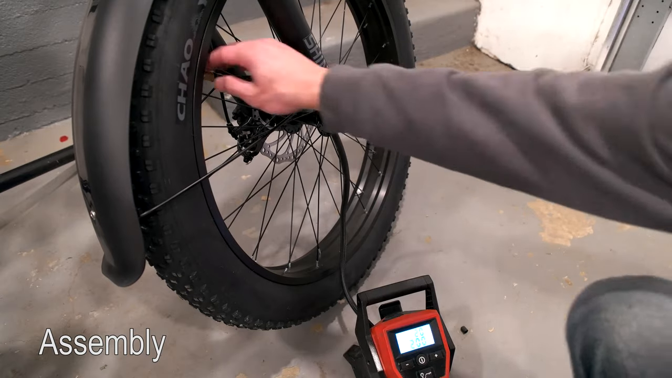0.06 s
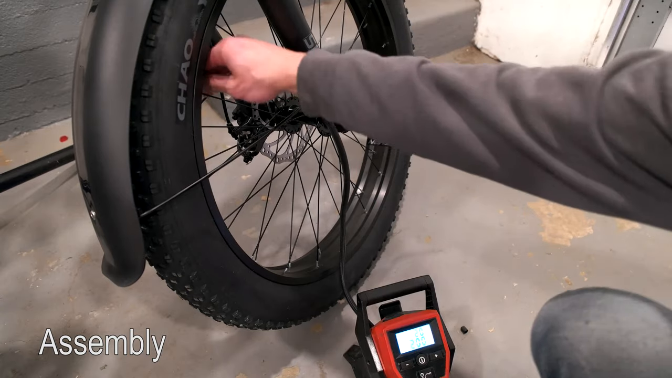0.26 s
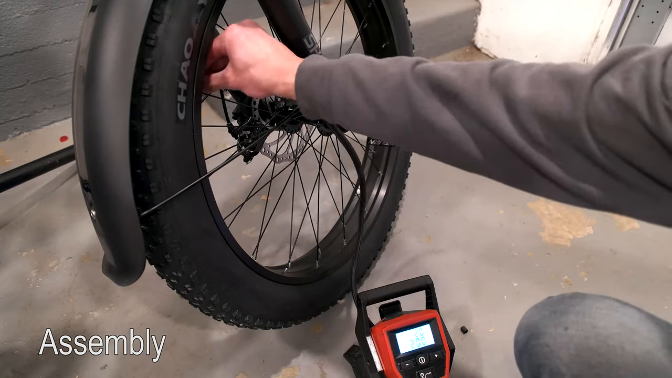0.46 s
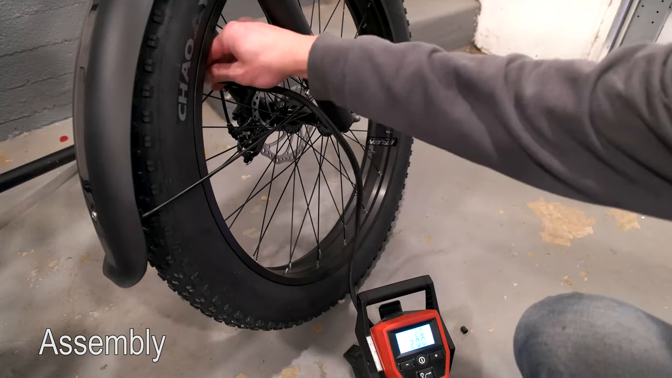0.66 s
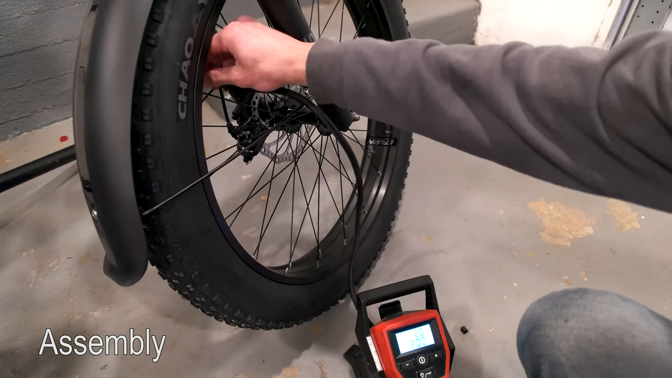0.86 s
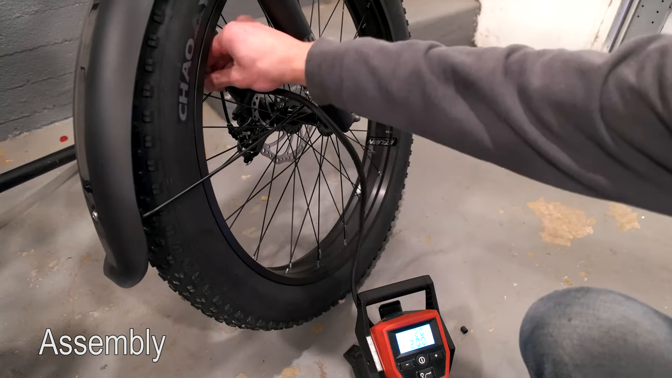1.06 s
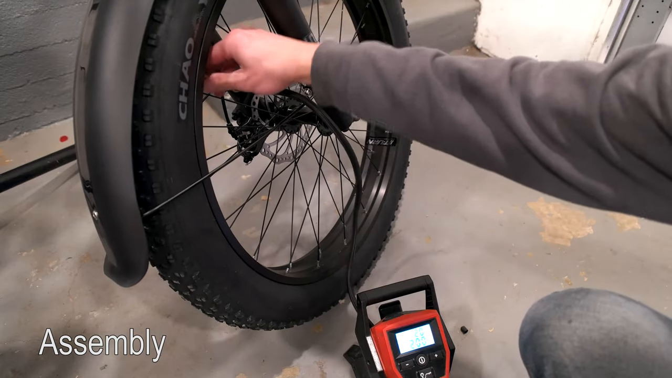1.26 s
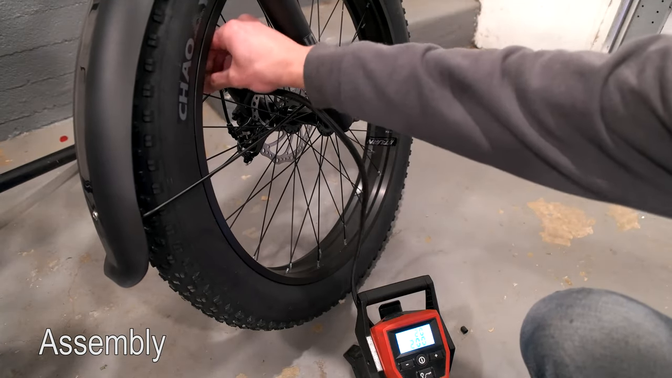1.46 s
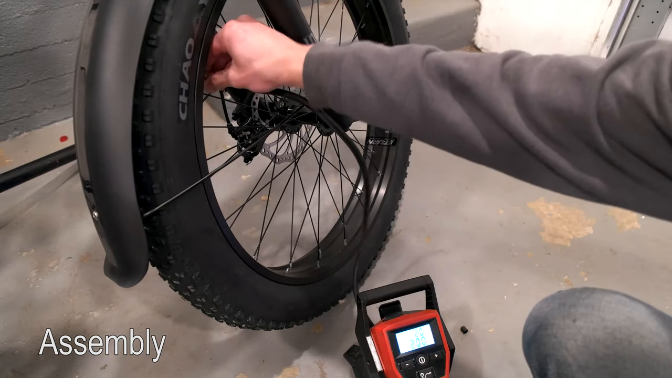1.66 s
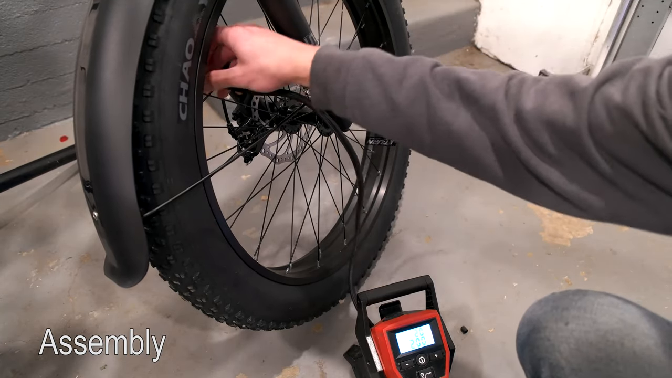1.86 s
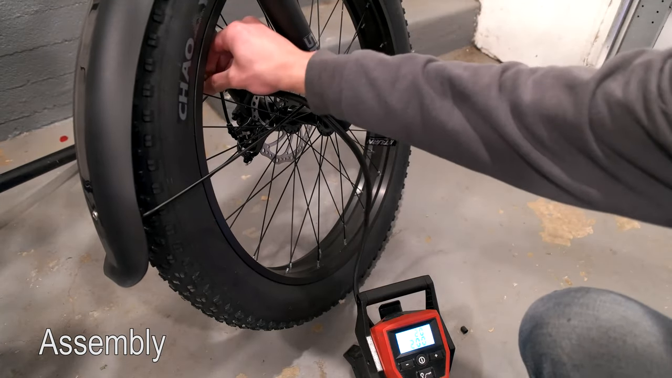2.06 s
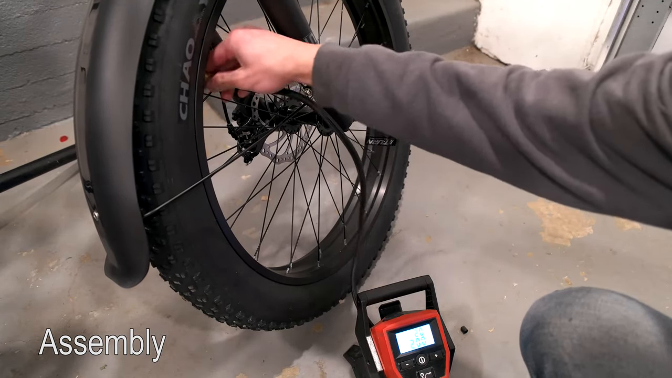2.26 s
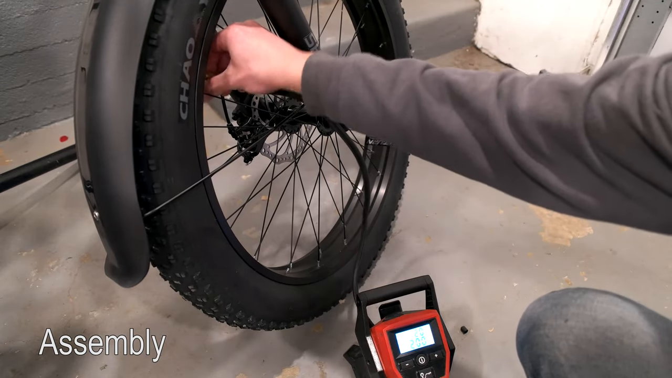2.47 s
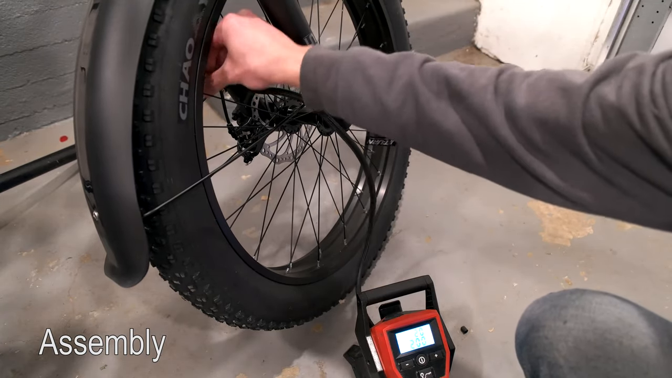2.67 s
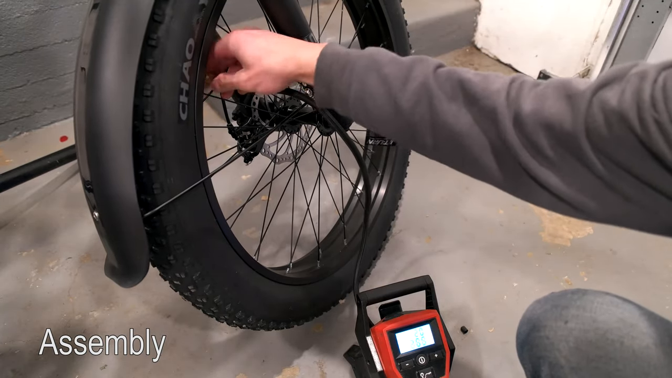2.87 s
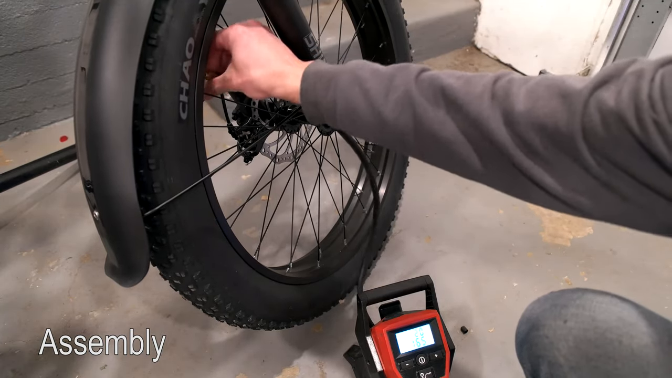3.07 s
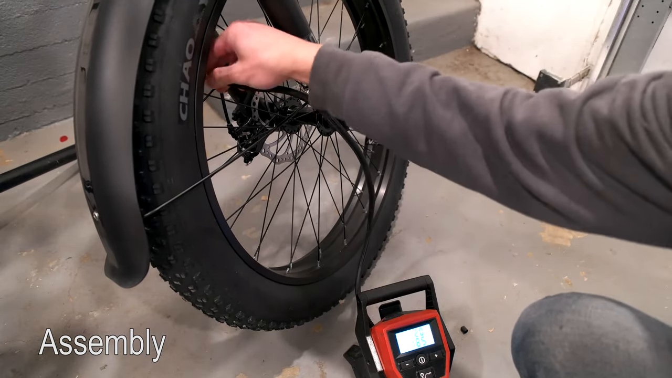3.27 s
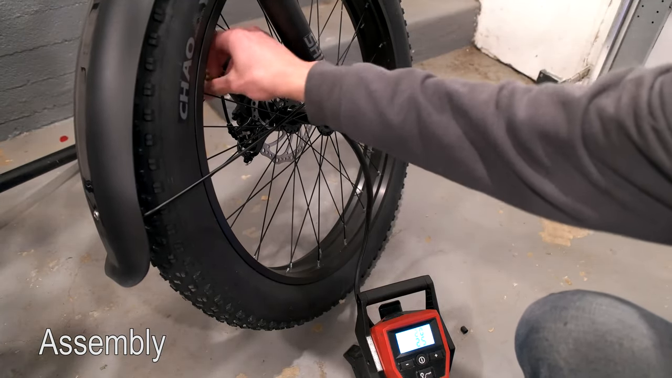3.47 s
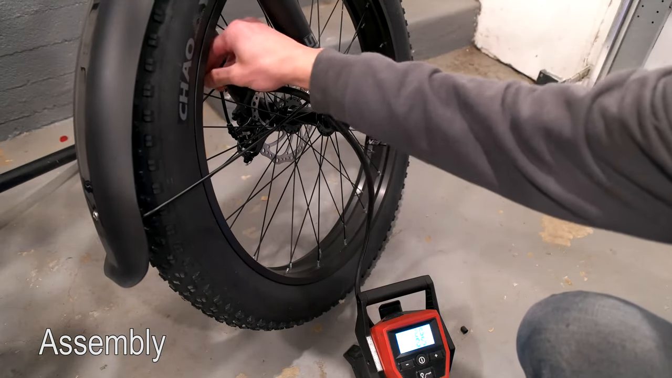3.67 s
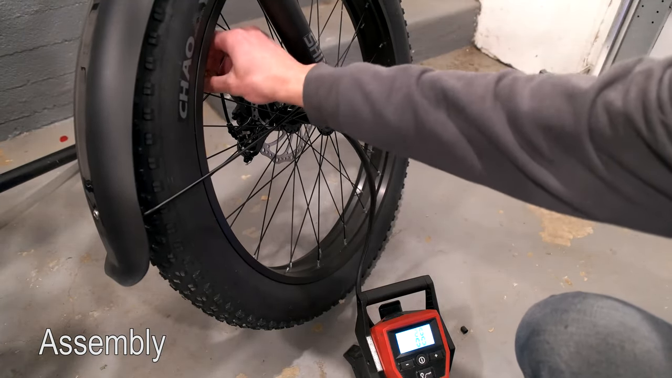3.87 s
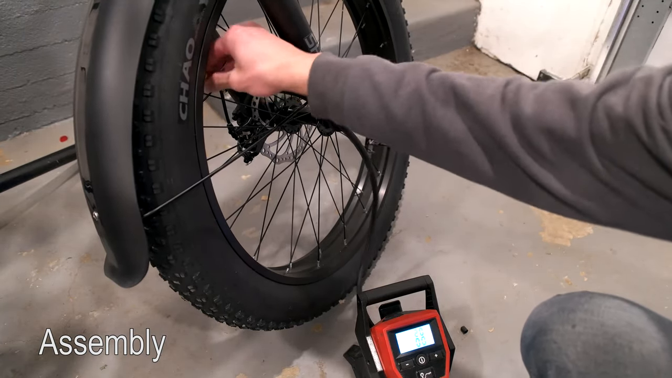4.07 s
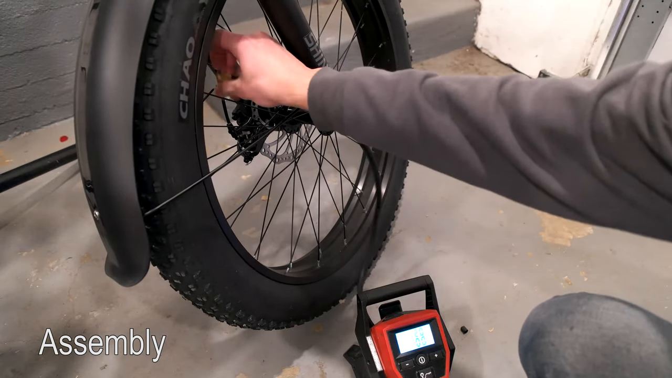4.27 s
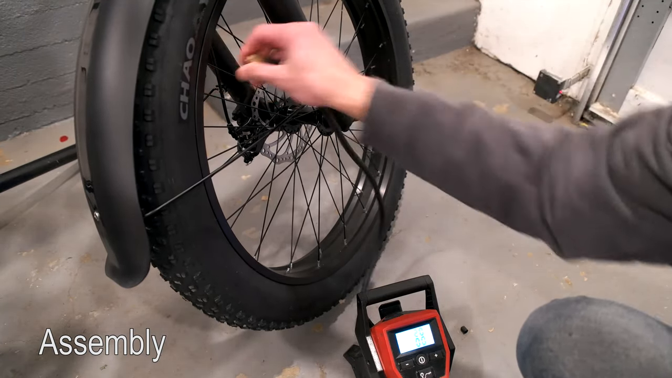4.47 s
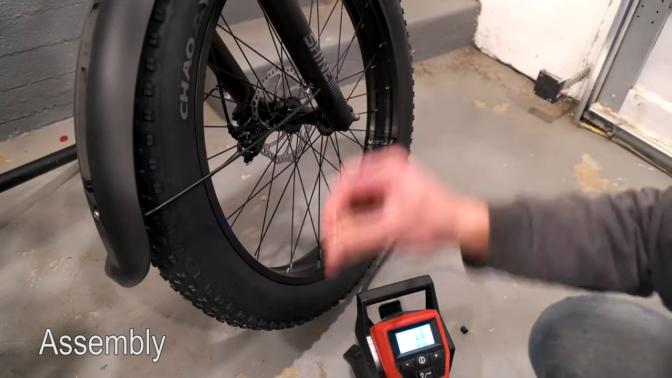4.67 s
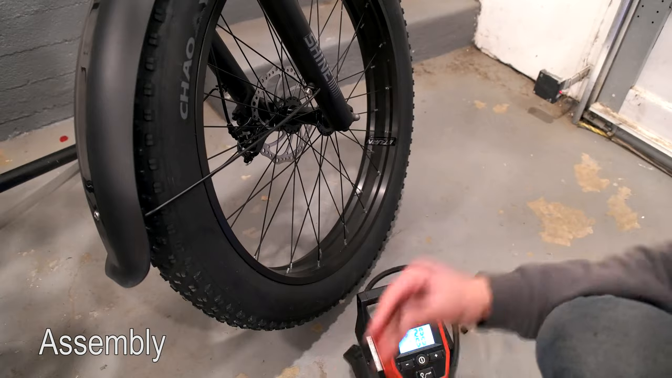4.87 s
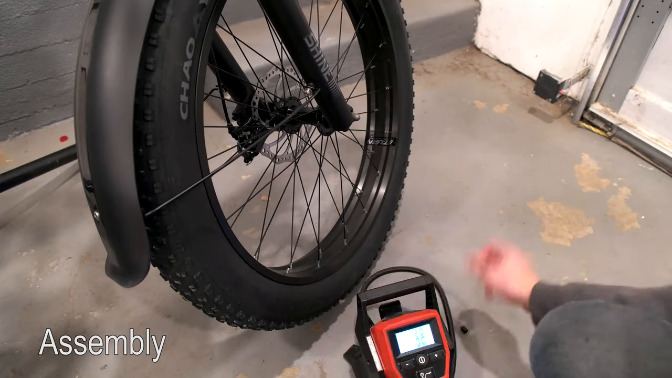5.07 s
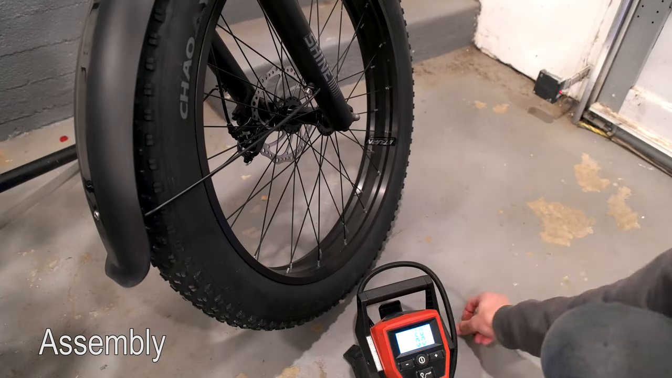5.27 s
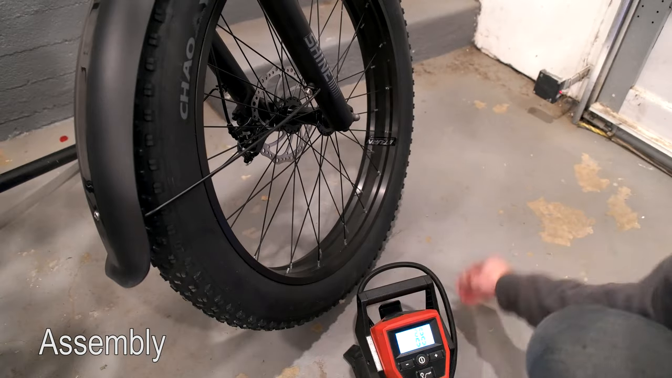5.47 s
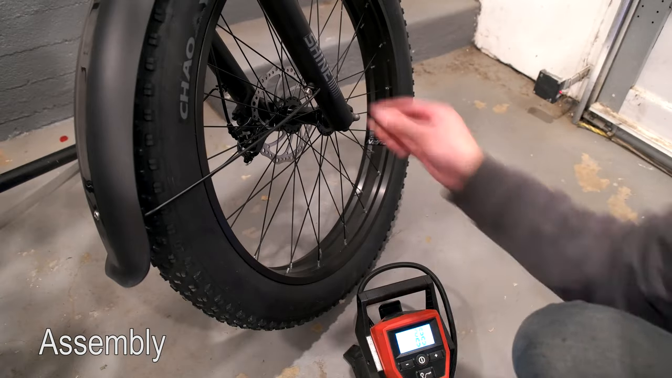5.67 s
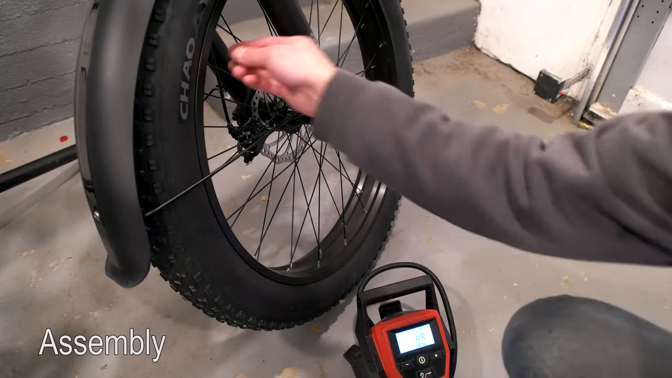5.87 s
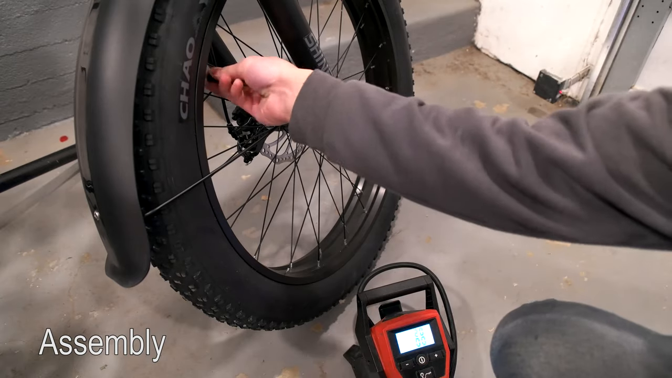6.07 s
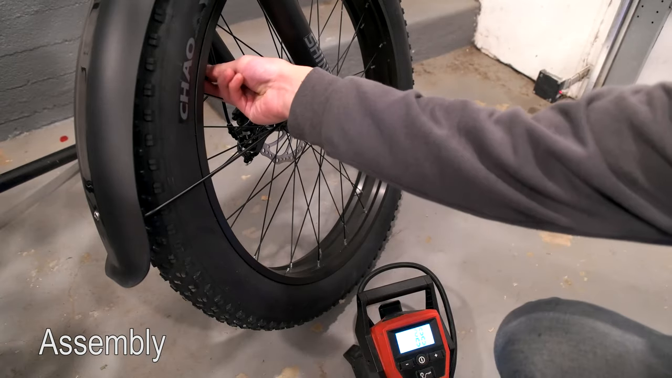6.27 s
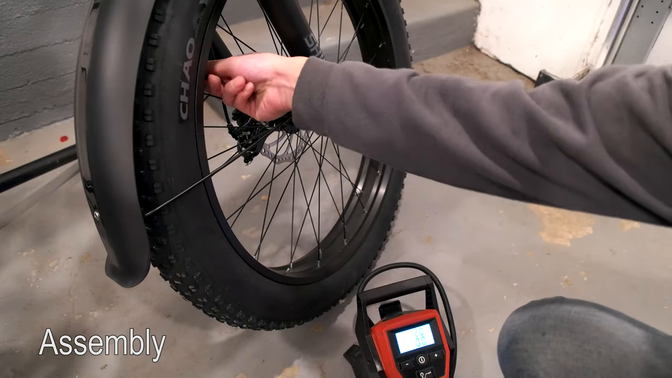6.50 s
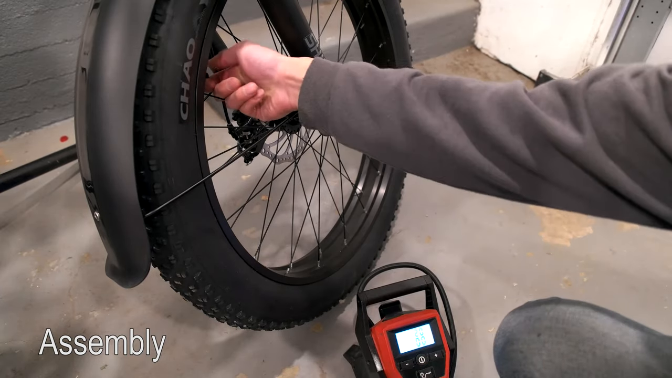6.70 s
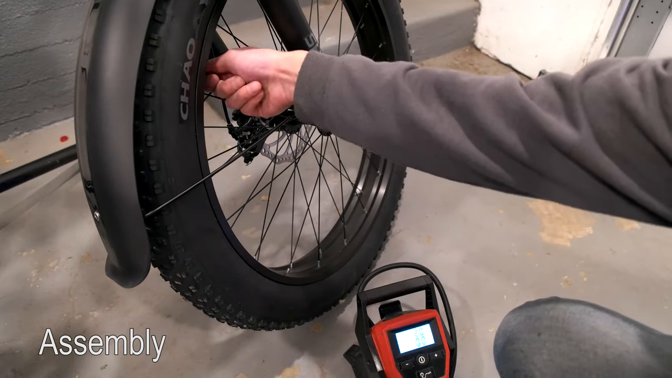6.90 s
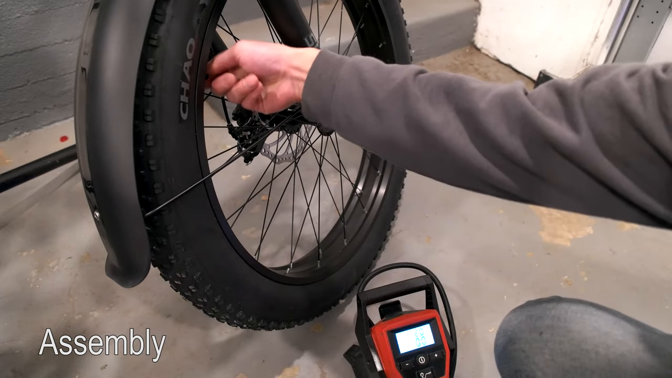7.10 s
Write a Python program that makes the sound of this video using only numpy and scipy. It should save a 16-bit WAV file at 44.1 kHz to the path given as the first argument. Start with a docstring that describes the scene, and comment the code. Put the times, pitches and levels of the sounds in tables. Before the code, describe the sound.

Small metal clicks and a bright leaking hiss at a bicycle wheel, two ringing knocks, a hard drop on the floor, then tiny cap clicks.

```python
"""Unscrewing a bicycle inflator hose

A hand unscrews an inflator hose from a tyre valve in a small, hard-floored room: filtered noise rasps and hisses
as thread and air jet, and dying sines ring as spokes and rim while the chuck comes free. The hose drops with
a sharp clack of resonant noise bursts and dull, damped taps; fingers then put on the valve cap in small clicks.
Cloth swishes, low room tone and a reverberant tail surround it all."""
import sys
import numpy as np
from scipy import signal
from scipy.fft import rfft, irfft
from scipy.io import wavfile
from scipy.ndimage import uniform_filter1d

SR = 44100
rng = np.random.default_rng(int(sys.argv[2]) if len(sys.argv) > 2 else 0)


def digitize_waveform(pressure):
    """Quantize a signal to 16-bit integers and store it at the path in sys.argv[1].

    Rows of a 2-D input are taken as channels; values are limited to [-1, 1].
    """
    field = np.atleast_2d(pressure).T
    bounded = np.clip(field, -1, 1)
    quanta = np.round(bounded * 32767).astype(np.int16)
    wavfile.write(sys.argv[1], SR, quanta)


N = 314874
TIME = np.arange(N) / SR  # s

# Spectra are columns f/Hz, level/dB per Hz; only their shape counts where the sound is scaled afterwards.
# Room tone spectrum: f/Hz, level/dB
AIR_SPECTRUM = [(20, -13), (40, -26.5), (70, -11.5), (130, -12.5), (254, -11), (512, -13.5), (1310, -18),
                (2020, -20.5), (3290, -25), (9930, -30), (15700, -34.5)]
# The room tone sinks slowly from its starting level (dB, dB per s)
AIR_START_DB, AIR_FADE_DB_PER_S = -51, 0.7
# Weight shifting on the floor: peak t/s, rumble level/dB before the rumble trim, length/s
WEIGHT_SHIFTS = [(5.1, -56.5, 2.8)]
# Rumble of the moving air relative to the jet, and a trim on all the rumble (dB)
DRAUGHT_DB, RUMBLE_TRIM_DB = -39.5, -2.5
# Decay of the room: f/Hz, t60/s
ROOM_DECAY = [(150, 0.3), (600, 0.31), (2000, 0.24), (6000, 0.22), (10000, 0.21), (15000, 0.19)]

# Strokes of the sleeve as the arm swings: peak t/s, level/dB before the cloth trim, length/s
SLEEVE_STROKES = [(.1, -61, 0.64), (4.58, -56.5, 0.42), (4.72, -51, 0.11), (4.86, -53, 0.28),
                  (4.945, -47.5, .05), (5.378, -54.5, 0.081), (6.54, -59.5, 0.18), (6.72, -58.5, 0.15)]
# Cloth spectrum: f/Hz, level/dB
CLOTH_SPECTRUM = [(600, -14.5), (1400, -3), (4000, -11.5), (7000, -10.5), (10500, -7), (15000, -25)]
# Turns of the screw thread: peak t/s, rubbing level/dB before the thread trim, length/s
THREAD_TURNS = [(.595, -45.5, 0.14), (.68, -53.5, .14), (.737, -51, 0.03), (.925, -48, 0.099),
                (.98, -38, 0.085)]
# Thread spectrum: f/Hz, level/dB
THREAD_SPECTRUM = [(120, -48), (200, -11.5), (427, -10.5), (512, -1), (636, -8.5), (1020, -6), (1600, -15),
                   (1750, -11), (3730, -24), (6300, -21), (15000, -36)]
# Fingers rubbing on chuck, spokes and cap: peak t/s, level/dB before the finger trim, length/s
FINGER_RUBS = [(1.14, -49.5, 0.26), (2.765, -43, 0.15), (2.853, -37, 0.031), (3.11, -50, 0.34),
               (3.44, -45, 0.23), (3.55, -45, 0.047), (3.79, -52, 0.17), (4.15, -50.5, 0.34),
               (4.37, -53, 0.17), (6.218, -46, 0.085), (6.264, -44, 0.044), (6.6, -51, 0.082),
               (7.13, -57, .2)]
# Finger spectrum: f/Hz, level/dB
FINGER_SPECTRUM = [(250, -19), (700, 2), (1100, 5), (1500, 4.5), (2200, -1), (3500, -15), (7000, -21.5),
                   (15000, -25)]
CLOTH_TRIM_DB, THREAD_TRIM_DB, FINGER_TRIM_DB = 0.5, 2.0, -3.5
# Every stroke: share of its length spent rising, drop at its ends (dB), roundness of its top (1 = pointed)
RISE_SHARE, STROKE_DROP_DB, ROUNDNESS = 0.43, 25.5, 1.53

# Dull taps of the rubber hose: t/s, level/dB before the mix of knock and slap, pitch f/Hz
HOSE_TAPS = [(4.946, -34.5, 525), (5.042, -27, 487), (5.141, -44, 380), (5.1703, -35, 634),
             (5.206, -38.5, 440), (5.382, -43, 417), (5.49, -37, 470), (5.555, -53, 413),
             (5.753, -43.5, 314)]
# The chuck lands: t/s, level/dB
CHUCK_LANDINGS = [(5.0031, -8), (5.0044, -13.5), (5.0088, -16.5)]
# Spectrum of the landing clack: f/Hz, level/dB
CLACK_SPECTRUM = [(40, -9), (100, -20), (250, -10.5), (420, -4), (560, -7.5), (1200, -3.5), (2400, -5.5),
                  (3200, -9), (4600, -7), (5600, -1), (8400, -2), (10000, -3.5), (13700, -9), (15300, 2.5)]
# Resonances of the landing chuck: f/Hz, width/Hz, lift/dB
CHUCK_RESONANCES = [(1050, 410, 2.5), (2150, 450, -2), (5520, 440, 1), (6050, 330, 2), (7300, 660, 6),
                    (8230, 260, 6.5)]

# Small metal parts touching: t/s, body level/dB, hardness (snap over body)/dB, body pitch f/Hz
METAL_CLICKS = [(.5546, -42.5, -19, 790), (.6714, -51, 3, 910), (.7323, -45, -7, 800),
                (1.3604, -44, -15, 820), (1.3865, -39, -7, 700), (1.4031, -38.5, -8, 786),
                (2.788, -35, -22, 1300), (2.8352, -39, -9, 1390), (3.176, -37.5, -9.5, 734),
                (3.4687, -43, -3, 1000), (3.93, -42, -36, 1360), (4.0754, -35.5, -4.5, 780),
                (4.2412, -38.5, 3.5, 1206), (4.248, -39, 0.5, 1160), (4.259, -37.5, -3, 1160),
                (4.37, -41, -7.5, 1160), (4.4601, -37, -13, 740), (4.9555, -43.5, 0, 800),
                (4.964, -49, 7, 800), (6.21, -41, -12, 4400), (6.564, -42.5, -5.5, 1100),
                (6.573, -44.5, -12, 930), (6.797, -49.5, -2, 2100), (6.834, -37, -2, 2210)]
# The middle clack of a click: dB relative to the midpoint of body and snap
CLICK_CLACK_DB = -5.5
# A firmer click chatters longer: t60 (s) at the usual level (dB), and the dB that double it
CLICK_BODY_T60_S, CLICK_T60_S, CLICK_USUAL_DB, CHATTER_DOUBLING_DB = 0.023, 0.027, -40, 12
# A faint tink as the hand reaches in between the spokes, one event: t/s, level/dB
SPOKE_TINK = (0.034, -54)
# Modes of that tink: f/Hz, relative level/dB, t60/s
TINK_PARTIALS = [(8600, -2, .22), (11500, 1, .2), (13000, -8, .12)]

# Blows that reach the wheel: t/s, level/dB, body level/dB relative to it, spoke ring level/dB
WHEEL_KNOCKS = [(0.637, -43.5, 3.5, -50), (1.311, -45, -1, -48.5), (1.83, -29, -7.5, -59),
                (1.9026, -26, 5.5, -35), (2.8659, -25.5, -2.5, -36.5), (3.581, -45.5, -7, -49),
                (3.619, -44.5, -2, -44), (7.059, -68.5, -4, -55.5)]
# Spoke modes: f/Hz, relative level/dB, t60/s
SPOKE_MODES = [(460, -6, 1.9), (771, -10, 0.32), (1130, 1.5, 0.54), (1207, -9.5, 0.36), (1620, -1, 0.53),
               (1770, 0.5, .6), (2322, -4, 0.32), (2450, 4, 0.35), (2740, -1, 0.3), (3250, -4.5, 0.19),
               (4050, -4.5, 0.13), (4350, -6.5, 0.19), (4930, -8, .18), (5440, -5.5, .18)]
# Rim and tyre modes: f/Hz, relative level/dB, t60/s
RIM_MODES = [(331, -11.5, 0.3), (381.6, -3, 0.47), (519, -6.5, 0.28), (633, -18.5, 0.18), (706, -1.5, 0.26),
             (778, 6.5, 0.15), (973, -11.5, 0.22), (1093, -5.5, .25), (1250, 3.5, 0.22), (1373, -2, 0.29)]
# Resonances of the chuck on its stem that colour every knock: f/Hz, width/Hz, lift/dB
STEM_RESONANCES = [(750, 110, 6.5), (3250, 180, 4), (4110, 220, 6), (5270, 350, 6)]
# A heavier body has less snap: snap (dB), snap lost per dB of body; and the rim relative to the body (dB)
KNOCK_SNAP_DB, SNAP_LOSS, RIM_DB = -7.5, 0.55, -6.5

# Jet spectrum: f/Hz, level/dB
JET_SPECTRUM = [(180, -69), (300, -32), (461, -17.5), (592, -18), (1040, -17.5), (1270, -13.5),
                (1600, -18.5), (2190, -11), (3480, -13), (3970, -9.5), (5620, -10), (10200, -5), (13300, 1),
                (15700, 1.5)]
# Cavities of the chuck that colour the jet: f/Hz, width/Hz, lift/dB
CHUCK_CAVITIES = [(2277, 100, 4.5), (3270, 160, 3.5), (4070, 250, 5), (5200, 440, 4.5), (7040, 200, 4),
                  (8330, 164.5, 2), (10500, 400, 3), (13080, 620, 5.5)]
# A short spit of air before the seal gives way, one stroke: peak t/s, level/dB before the jet trim, length/s
AIR_SPIT = (1.222, -37.5, .14)
# The long leak, as the gap in the thread opens and closes:
# t/s, jet level/dB before the jet trim, top sizzle/dB relative to the jet before the sizzle trim
LONG_LEAK = [(1.435, -73, -4), (1.453, -31.5, 1), (1.487, -22, -8), (1.561, -24, 1), (1.619, -28, -1),
             (1.677, -25, 8), (1.757, -18, -1), (1.831, -27, 2.5), (2.193, -18.5, -0.5),
             (2.271, -24.5, -3.5), (2.359, -19.5, 1.5), (2.409, -14.5, -4.5), (2.463, -22, -0.5),
             (2.591, -34, 1), (2.663, -30.5, 5.5), (2.771, -45, -1), (2.82, -62, -7)]
SPIT_SIZZLE_DB, SIZZLE_TRIM_DB, JET_TRIM_DB = 3, 1.0, -1
# The low roar keeps pace with a weak jet and falls behind a strong one:
# dB relative to the jet, untrimmed jet dB where it starts to lag, dB lost per dB
ROAR_DB, ROAR_KNEE_DB, ROAR_LAG = -2, -37, 0.52


def gain_of(db):
    """Decibels to amplitude."""
    return 10 ** (np.asarray(db) / 20)


def evened(x):
    """Scales to rms 1."""
    return x / np.sqrt(np.mean(x ** 2) + 1e-20)


def struck(x):
    """Scales a blow to the energy of 4 ms at rms 1."""
    return x / np.sqrt(np.sum(x ** 2) / (0.004 * SR))


def read(points, hz):
    """Reads a table along a log-frequency axis."""
    f, value = np.transpose(points)
    return np.interp(np.log(hz + 1), np.log(f + 1), value)


def add(mix, s, sound):
    """Mixes a sound in at time s."""
    part = mix[round(s * SR):][:len(sound)]
    part += sound[:len(part)]


def coloured(x, spectrum, peaks=()):
    """Causal minimum-phase filter with a smooth spectrum and a few resonant lifts."""
    hz = abs(np.fft.fftfreq(4096, 1 / SR))
    db = read(spectrum, hz)
    for f, width, lift in peaks:
        db = db + lift / (1 + (2 * (hz - f) / width) ** 2)
    # the Hilbert transform of the log level gives the phase
    response = np.exp(np.conj(signal.hilbert(np.log(gain_of(db)))))
    taps = np.fft.ifft(response).real
    return signal.oaconvolve(x, taps[:len(taps) // 2])[:len(x)]


def band(x, lo_hz, hi_hz, order=2):
    """Band-pass filter."""
    edges = [lo_hz, min(hi_hz, SR / 2 - 1000)]
    return signal.sosfilt(signal.butter(order, edges, "band", fs=SR, output="sos"), x)


def low_passed(x, hz):
    """Steep low-pass without delay."""
    return signal.sosfiltfilt(signal.butter(4, hz, fs=SR, output="sos"), x)


def wander(rate_hz):
    """Random drift of rms 1, weakening above the given rate."""
    spectrum = rfft(rng.standard_normal(N))
    slowed = spectrum / (1 + (np.fft.rfftfreq(N, 1 / SR) / rate_hz) ** 2)
    return evened(irfft(slowed, N))


def strokes(rows):
    """Gain over time of separate strokes, each rising a little faster than it falls."""
    power = np.zeros(N)
    for s, db, length in rows:
        away = np.maximum((s - TIME) / RISE_SHARE, (TIME - s) / (1 - RISE_SHARE)) / length
        power += gain_of(db - STROKE_DROP_DB * np.minimum(away, 10) ** ROUNDNESS) ** 2
    return np.sqrt(power)


def contact(t60, spike):
    """A sharp first touch and the dying noise chatter that follows it."""
    t = np.arange(SR // 4) / SR
    x = rng.standard_normal(len(t)) * gain_of(-60 * t / t60)
    x[0] += spike
    return x


def blow(body_db, snap_db, body_hz, body_t60, t60, spike):
    """A contact heard as low body, middle clack and high snap."""
    body = struck(band(contact(body_t60, spike), body_hz / 1.97, body_hz * 1.52))
    clack = struck(band(contact(t60, spike), 1700, 4400))
    snap = struck(band(contact(t60, spike), 4240, 9500))
    return gain_of(body_db) * body + clack + gain_of(snap_db) * snap


def ring(modes):
    """Dying sines of a struck body; each mode is a close pair that beats."""
    t, x = np.arange(SR) / SR, np.zeros(SR)
    for hz, db, t60 in modes:
        phase, twin_phase, split = rng.random(3)
        twin_hz = hz + 7 + 16 * split
        main = np.sin(2 * np.pi * (hz * t + phase))
        twin = 0.5 * np.sin(2 * np.pi * (twin_hz * t + twin_phase))
        x += gain_of(db - 60 * t / t60) * (main + twin)
    return x / np.linalg.norm(gain_of([db for _, db, _ in modes]))


def room(x):
    """Dense reflections from floor and near walls, each band dying at its own speed."""
    reflections = rng.choice([-1., 1.], SR // 2) * (rng.random(SR // 2) < 5000 / SR)
    hz, t, z = signal.stft(reflections, SR, nperseg=256)
    decay = gain_of(-60 * t / read(ROOM_DECAY, hz)[:, None])
    tail = signal.istft(z * decay, SR, nperseg=256)[1]
    tail = np.concatenate([np.zeros(round(0.0025 * SR)), tail])  # 2.5 ms pre-delay
    return signal.fftconvolve(x, tail / np.linalg.norm(tail))[:N]


def room_tone():
    """A low, even wash, and a soft rumble from the jet's draught and from shifting weight."""
    wash_db = AIR_START_DB - AIR_FADE_DB_PER_S * TIME + 0.5 * wander(26.7)
    wash = gain_of(wash_db) * evened(coloured(rng.standard_normal(N), AIR_SPECTRUM))
    rumble_gain = gain_of(jet()[0] + DRAUGHT_DB) + strokes(WEIGHT_SHIFTS)
    unsteady = gain_of(RUMBLE_TRIM_DB + 2.4 * wander(12))
    return wash + unsteady * rumble_gain * evened(band(rng.standard_normal(N), 39.0, 250))


def sleeve():
    """Soft, uneven swish of cloth: coloured noise under a drifting gain."""
    unsteady = gain_of(CLOTH_TRIM_DB + 2.0 * wander(75))
    return unsteady * strokes(SLEEVE_STROKES) * evened(coloured(rng.standard_normal(N), CLOTH_SPECTRUM))


def friction(rows, spectrum, slips_per_s):
    """Rubbing surfaces stick and slip in many tiny ticks of random size, over plain noise."""
    slip_here = rng.random(N) < slips_per_s / SR
    size = gain_of(4.0 * np.minimum(rng.exponential(1, N), 3))
    slips = slip_here * size * rng.choice([-1, 1], N)
    rub = evened(slips) + 0.9 * rng.standard_normal(N)
    return strokes(rows) * evened(coloured(rub, spectrum))


def hose():
    """Rubber taps: a low, heavily damped knock with a little slap."""
    out, t = np.zeros(N), np.arange(SR // 4) / SR
    for s, db, hz in HOSE_TAPS:
        knock = struck(np.sin(2 * np.pi * hz * t) * gain_of(-60 * t / 0.026))
        slap = struck(band(contact(t60=0.019, spike=1.5), 320, 1060))
        add(out, s, gain_of(db) * (gain_of(-2.5) * knock + gain_of(-8) * slap))
    return out


def landing():
    """The metal chuck strikes hard and bounces, each time a burst through its damped resonances."""
    out = np.zeros(N)
    for s, db in CHUCK_LANDINGS:
        burst = coloured(contact(t60=0.014, spike=0.47), CLACK_SPECTRUM, CHUCK_RESONANCES)
        add(out, s, gain_of(db) * struck(burst))
    return out


def small_metal_parts():
    """Short clicks of chuck and valve cap, brighter if harder, longer if firmer; and one ringing tink."""
    out = np.zeros(N)
    for s, db, hard_db, body_hz in METAL_CLICKS:
        clack_db = hard_db / 2 + CLICK_CLACK_DB  # relative to the body
        stretch = 2 ** ((db - CLICK_USUAL_DB) / CHATTER_DOUBLING_DB)
        # body and snap are set relative to the clack
        click = blow(-clack_db, hard_db - clack_db, body_hz,
                     stretch * CLICK_BODY_T60_S, stretch * CLICK_T60_S, spike=3.2)
        add(out, s, gain_of(db + clack_db) * click)
    tink_s, tink_db = SPOKE_TINK
    add(out, tink_s, gain_of(tink_db) * ring(TINK_PARTIALS))
    return out


def wheel():
    """The chuck jerks on the valve stem; the rim booms and the spokes ring."""
    out = np.zeros(N)
    for s, db, body_db, spoke_db in WHEEL_KNOCKS:
        snap_db = KNOCK_SNAP_DB - SNAP_LOSS * body_db
        knock = blow(body_db, snap_db, body_hz=795, body_t60=0.09, t60=0.036, spike=4.5)
        flat = [(0, 0)]  # no colour but the resonances
        add(out, s, gain_of(db) * coloured(knock, flat, STEM_RESONANCES))
        add(out, s, gain_of(spoke_db) * ring(SPOKE_MODES))
        add(out, s, gain_of(db + body_db + RIM_DB) * ring(RIM_MODES))
    return out


def jet():
    """Untrimmed level of the jet and of its top sizzle over time (dB): first the spit, then the long leak."""
    s, db, sizzle_db = np.transpose(LONG_LEAK)
    leak = gain_of(np.interp(TIME, s, db, left=-150, right=-150))
    jet_db = 20 * np.log10(leak + strokes([AIR_SPIT]))
    return jet_db, np.interp(TIME, s, sizzle_db, left=SPIT_SIZZLE_DB)


def hiss():
    """A turbulent jet through the gap in the thread; it flutters, and changes colour with its level."""
    z = signal.stft(coloured(rng.standard_normal(N), JET_SPECTRUM, CHUCK_CAVITIES), nperseg=512)[2]
    # eddies lift and sink patches of the spectrum for a few hundredths of a second
    patches = uniform_filter1d(rng.standard_normal(z.shape), size=8, axis=0)
    eddies = evened(uniform_filter1d(patches, size=10, axis=1))
    flow = signal.istft(z * gain_of(1.5 * eddies), nperseg=512)[1][:N]
    roar, below_top = low_passed(flow, 7000), low_passed(flow, 11500)
    jet_db, sizzle_db = jet()
    roar_db = ROAR_DB - ROAR_LAG * np.maximum(jet_db - ROAR_KNEE_DB, 0)
    sound = gain_of(roar_db) * evened(roar)
    sound += evened(below_top - roar)
    sound += gain_of(sizzle_db + SIZZLE_TRIM_DB) * evened(flow - below_top)
    flutter_db = 0.44 * wander(61.3) + 0.72 * wander(500)
    return gain_of(JET_TRIM_DB + flutter_db + jet_db) * sound


def scene():
    """All sources with their share of room, alike in both ears."""
    thread = gain_of(THREAD_TRIM_DB) * friction(THREAD_TURNS, THREAD_SPECTRUM, slips_per_s=530)
    fingers = gain_of(FINGER_TRIM_DB) * friction(FINGER_RUBS, FINGER_SPECTRUM, slips_per_s=1200)
    taps, clack, air = hose(), landing(), hiss()
    metal = wheel() + small_metal_parts() + thread + fingers
    sent = gain_of(-8) * air + gain_of(-1.5) * metal + gain_of(-6.5) * clack + gain_of(-11.0) * taps
    mono = room_tone() + sleeve() + taps + clack + metal + air + room(sent)
    return np.array([mono, mono])


def record(dry):
    """The microphone softly rounds off the highest peaks; then a steep low-pass limits the band."""
    ceiling, edge_hz = 0.65, 15720
    rounded = dry / (1 + (dry / ceiling) ** 4) ** (1 / 4)
    low_pass = signal.firwin(511, edge_hz, window=("kaiser", 9), fs=SR)
    return signal.oaconvolve(rounded, low_pass[None], "same")


dry = scene()
out = record(dry)
digitize_waveform(out)
```